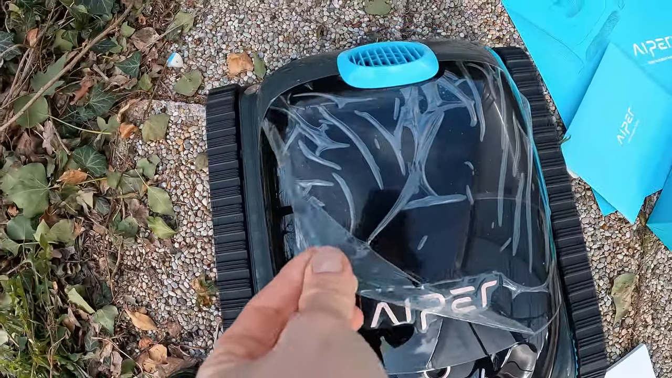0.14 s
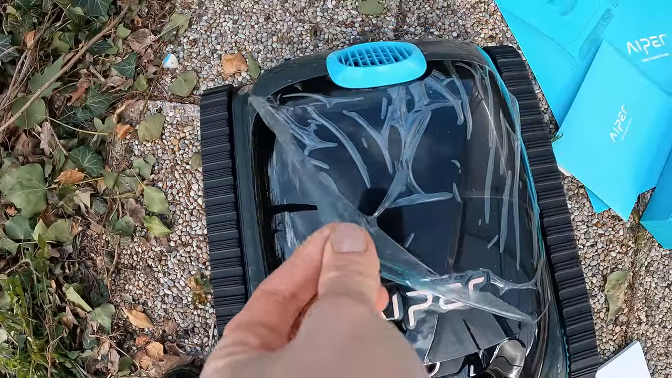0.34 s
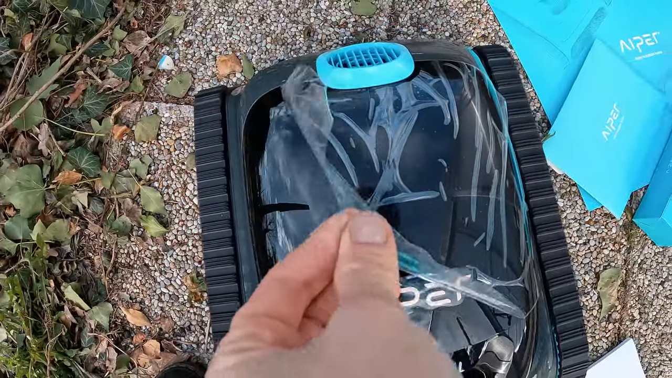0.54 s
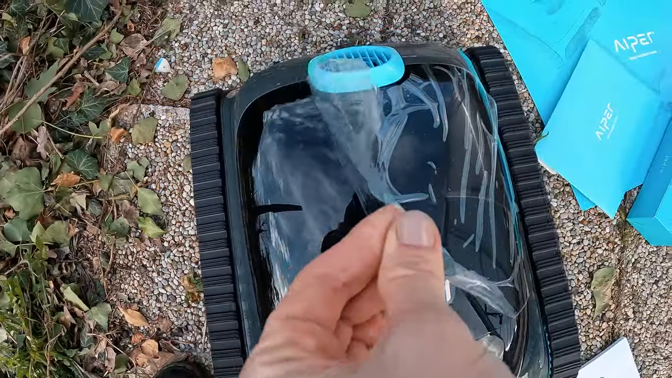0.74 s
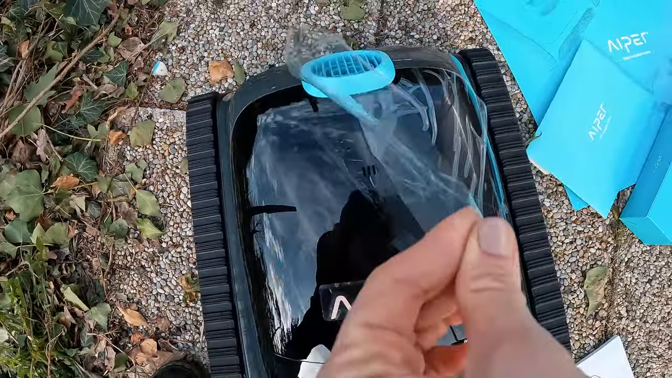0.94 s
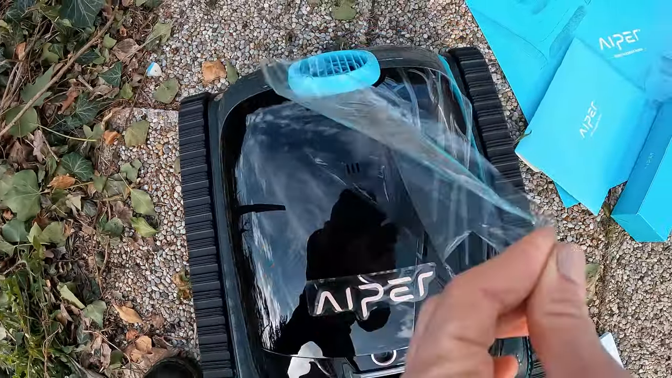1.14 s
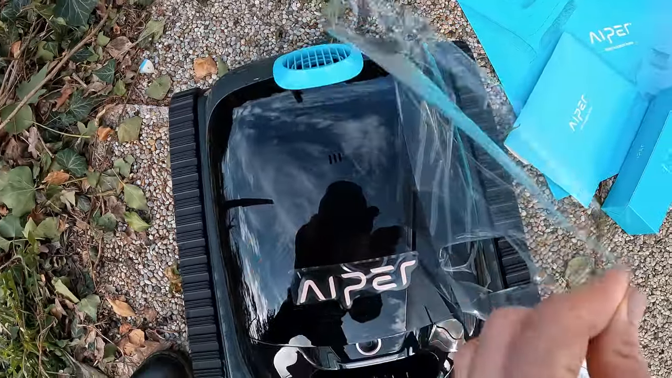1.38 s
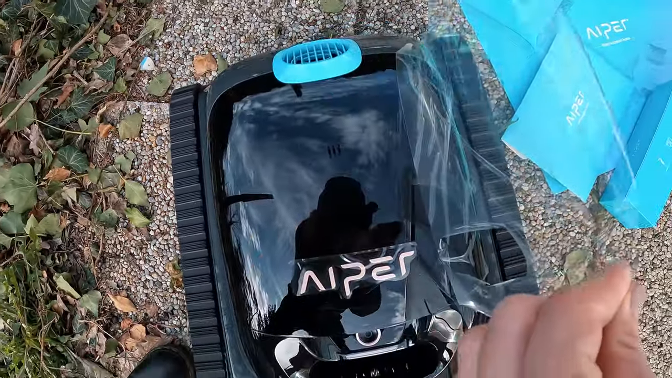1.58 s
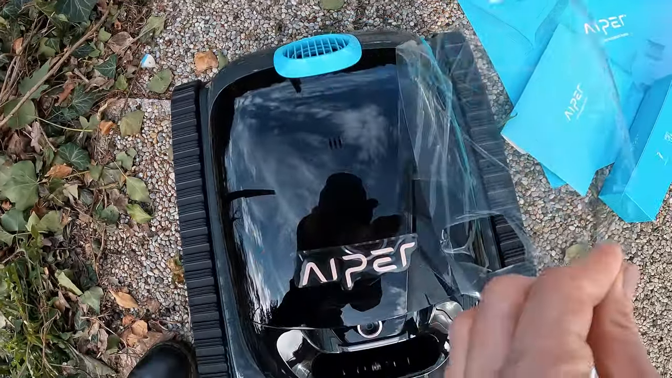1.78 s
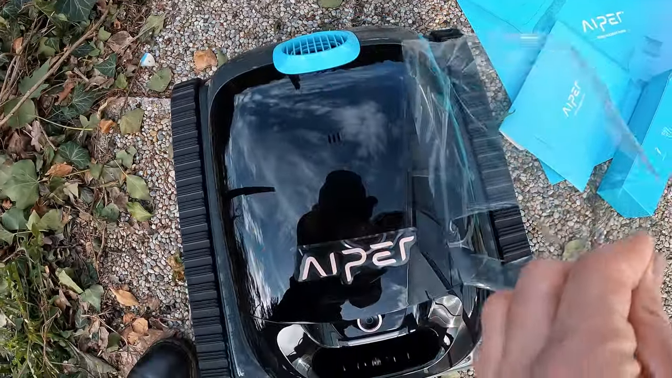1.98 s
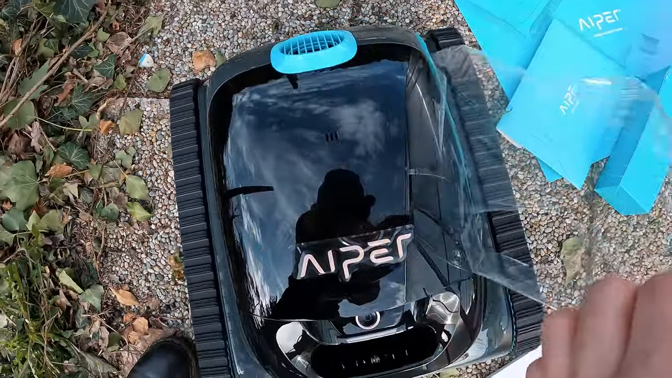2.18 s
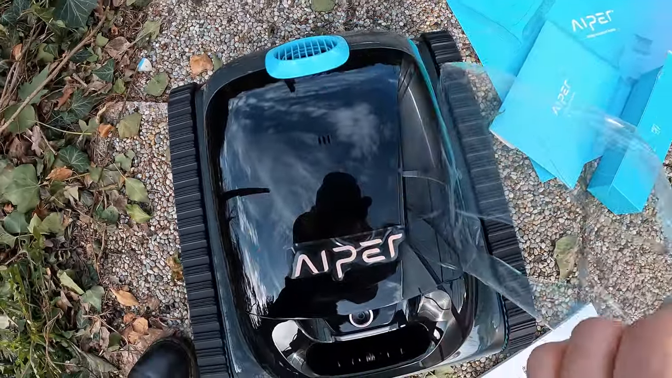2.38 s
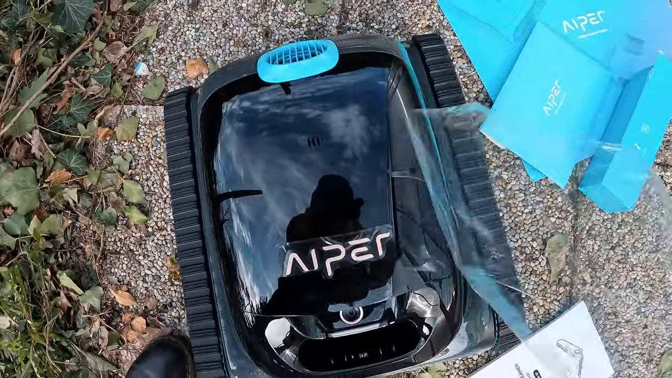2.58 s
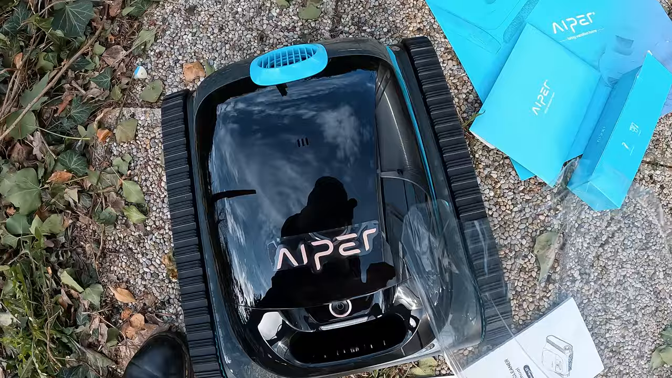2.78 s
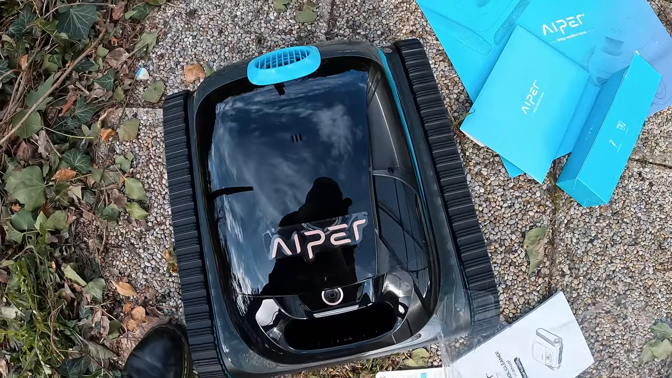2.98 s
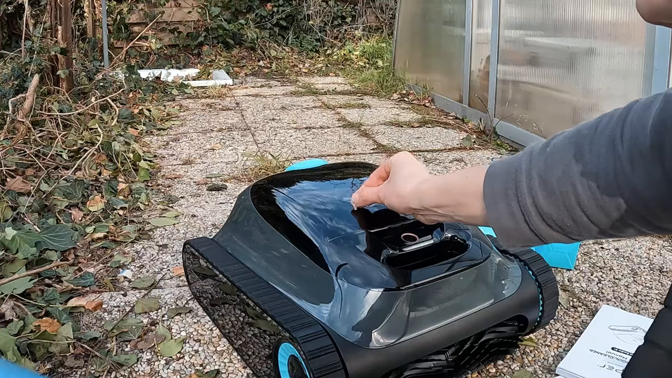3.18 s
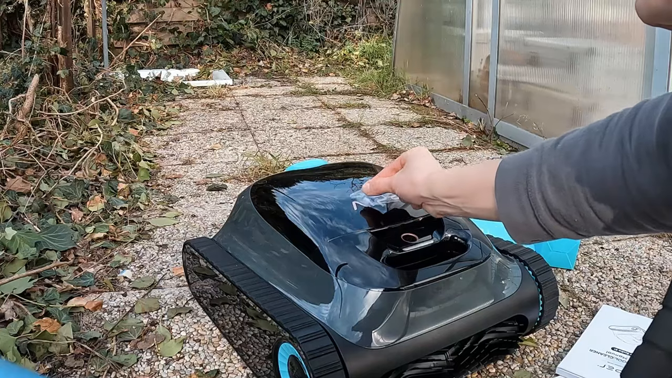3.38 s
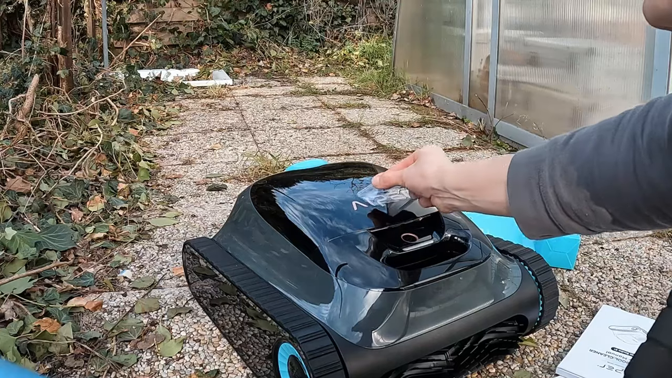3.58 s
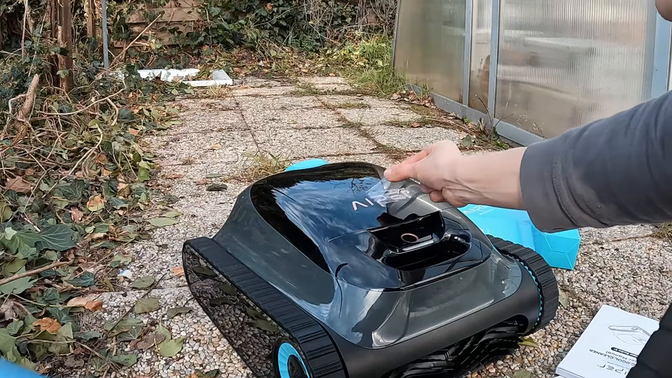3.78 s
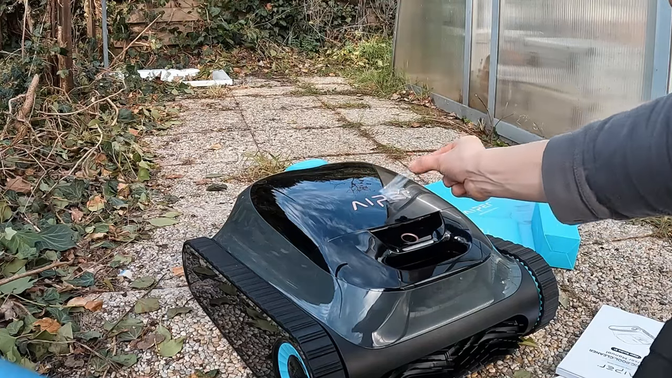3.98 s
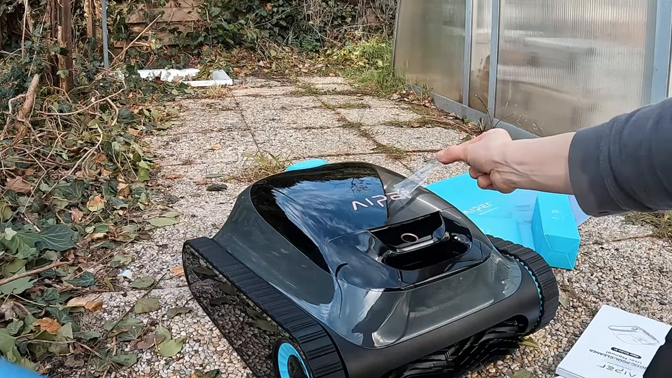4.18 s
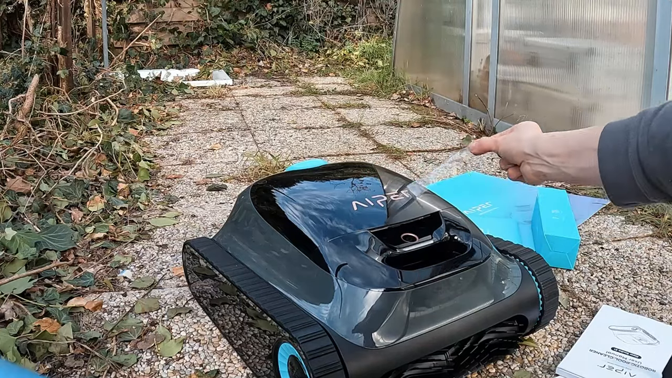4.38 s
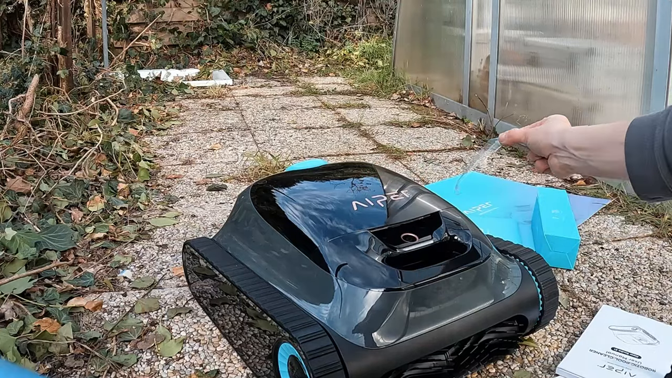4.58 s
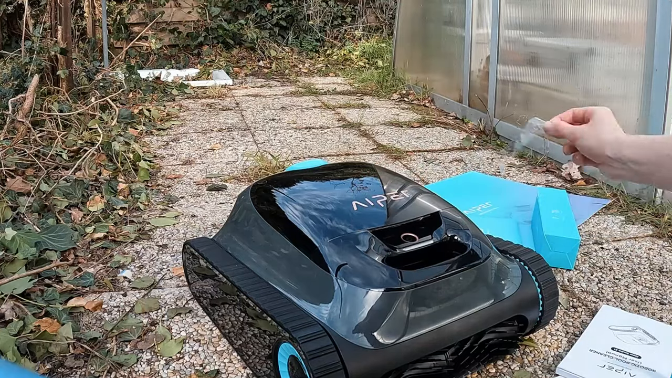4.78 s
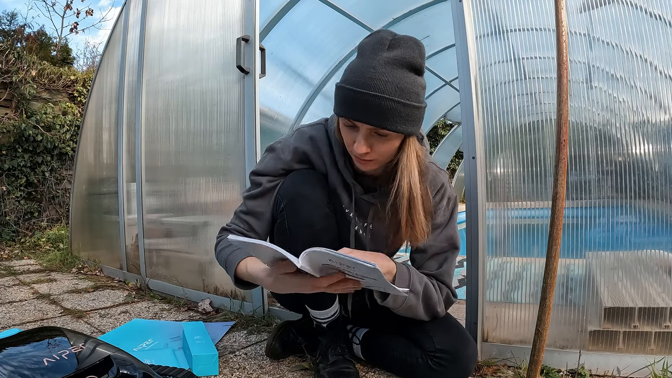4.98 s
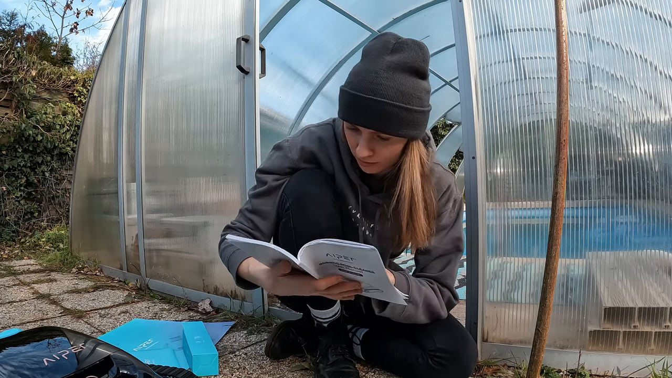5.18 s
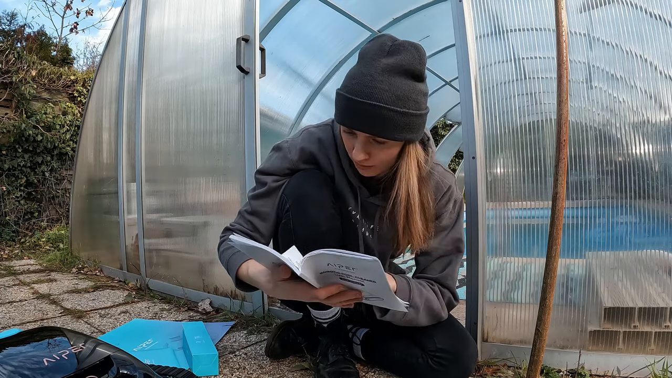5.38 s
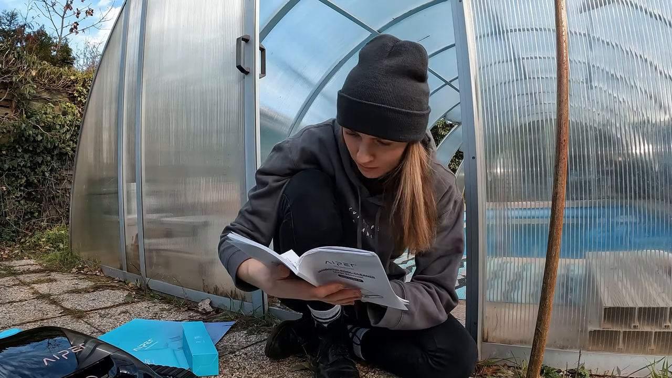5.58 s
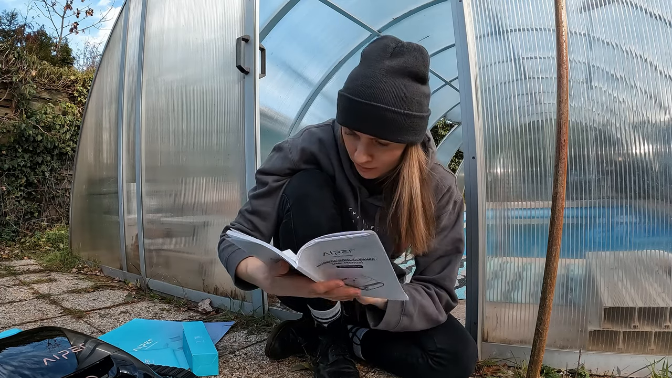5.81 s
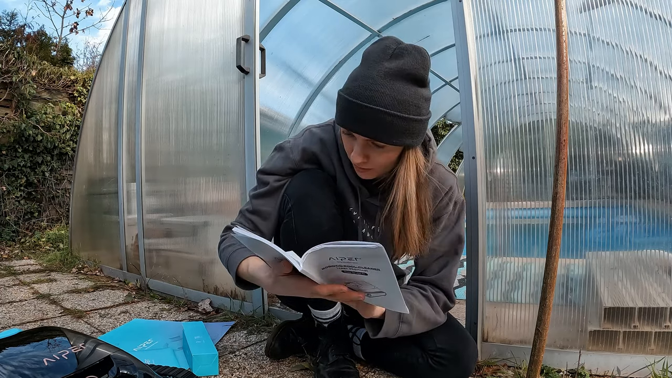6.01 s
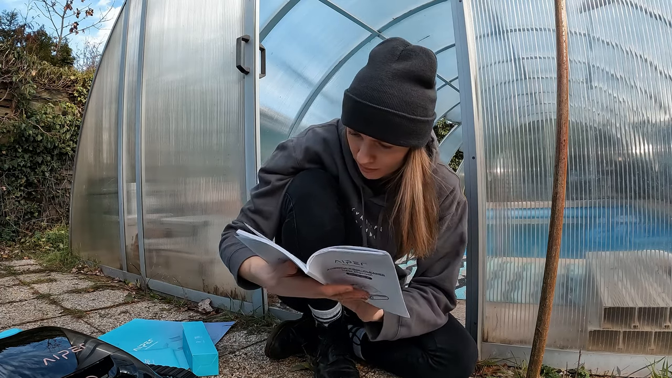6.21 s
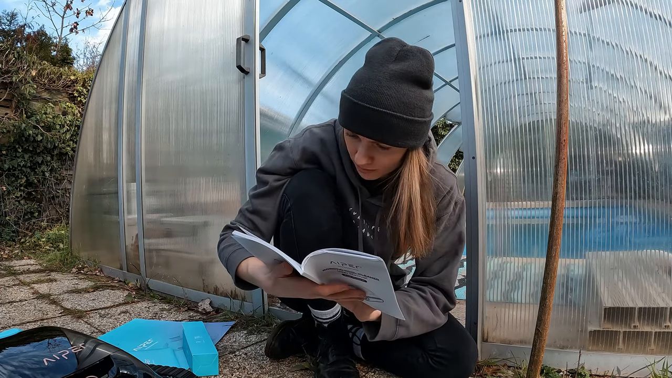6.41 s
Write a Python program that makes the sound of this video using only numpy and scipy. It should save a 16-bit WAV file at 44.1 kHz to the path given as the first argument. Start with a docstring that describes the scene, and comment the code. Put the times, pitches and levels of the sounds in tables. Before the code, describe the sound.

Close outdoors, a large sheet of clinging film is pulled from a hollow plastic lid in bright, sizzling tugs with sharp snaps and a squeak. After a lull, faster pulls end in a hollow thump. A narrow strip then peels more quietly with dry ticks. Finally pages rustle softly while small birds whistle and trill, and a harsh squawk bursts in at the very end.

```python
"""A garden: protective film is peeled off a glossy plastic lid. A large sheet comes off in several pulls and ends
with a thump of the hollow shell, then a narrow strip follows. Random tiny clicks, coloured by filters, make the
slipping glue and the rustling film and pages; short kicks make the creases snap; fading sine waves make the shell
ring. Small birds are gliding sine waves, and the harsh squawk that begins near the end is clicks through
narrow resonances. Filtered noise makes the air behind it all."""
import sys
import numpy as np
from scipy import signal
from scipy.fft import rfft, irfft, next_fast_len
from scipy.io import wavfile
from scipy.ndimage import uniform_filter1d

SR = 44100
rng = np.random.default_rng(int(sys.argv[2]) if len(sys.argv) > 2 else 0)


def generate_wav(signal):
    """Clip the signal to [-1, 1] and save it as 16-bit WAV at the path in sys.argv[1]."""
    frames = np.transpose(np.atleast_2d(signal))
    scaled = np.clip(frames, -1, 1) * 32767
    pcm = np.round(scaled).astype(np.int16)
    wavfile.write(sys.argv[1], SR, pcm)


N = 284397
TIME = np.arange(N) / SR  # seconds

# tone colours, only their shape counts: (frequency [Hz], level per Hz [dB])
AIR_COLOUR = [(25, -14.5), (90, -22.5), (170, 4.5), (400, 2.5), (800, -3.5), (1800, -4.5), (3700, -5.5),
              (6000, -18.5), (8000, -28), (12500, -34)]
PAGE_COLOUR = [(40, -41), (170, -6), (400, -2), (900, -10), (1400, -0.5), (2300, 0.5), (3600, -3),
               (6000, -9), (8000, -24), (12000, -30)]
STRIP_COLOUR = [(400, -25.5), (1200, -11), (1900, -7.5), (2700, -0.5), (3200, -2.5), (3900, 4.5),
                (5000, -6), (6000, -6), (8000, -16.5), (11800, -15.5), (13500, -26)]
FLAP_COLOUR = [(60, -31), (110, -20.5), (170, -2), (450, -1.5), (1100, -3.5), (2000, -24), (5000, -63.5)]
SHEET_COLOUR = [(300, -21), (700, -5.5), (1400, -5), (2200, 0), (3500, 0), (5000, -2.5), (7000, -6),
                (8300, -13.5), (11500, -8), (13500, -18)]
# the garden is heard from three places in turn: (from time [s], air level [dB], low rumble level [dB])
PLACES = [(-.1, -58, -95), (3.108, -55.5, -89), (4.947, -63, -72)]
# how long echoes last in the yard: (frequency [Hz], time to fade by 60 dB [s])
YARD_FADE = [(150, 0.4), (2000, 0.67), (8000, 0.61), (13000, 0.4)]
# single bird notes: (time [s], length [s], first pitch [Hz], last pitch [Hz], level [dB])
BIRD_NOTES = [(3.107, 0.067, 6800, 6750, -65), (4.585, 0.29, 4330, 3630, -59),
              (5.291, 0.049, 6120, 5720, -60), (5.338, 0.044, 6000, 5750, -60.5),
              (5.801, 0.14, 3804, 4130, -51), (6.08, 0.16, 8200, 8270, -72), (6.198, 0.03, 6770, 6020, -67),
              (6.23, 0.12, 3510, 4980, -55)]
# resonances of the squawk: (frequency [Hz], half the width of each filter [Hz], relative level [dB])
SQUAWK_RESONANCES = [(1160, 66, -4.5), (1480, 440, 4), (1776, 60, 1.5), (2070, 110, 5), (2640, 84, 2)]
# rubs of the loose film, then of the pages: (start [s], length [s], level at the top of the arch [dB])
RUBS = [(1.46, 0.2, -49.5), (1.863, 0.099, -44), (1.96, 0.051, -37), (4.398, 0.46, -65),
        (4.85, 0.11, -53.5), (5.063, 0.33, -58), (5.405, 0.056, -52), (5.478, 0.074, -54),
        (5.976, 0.13, -50.5)]
# flicks of the loose film and of the pages: (time [s], peak [dB], pitch [Hz])
FLICKS = [(4.873, -27.5, 4150), (5.365, -38, 1900), (5.449, -37.5, 2520), (5.818, -40, 4140),
          (6.263, -35.5, 3330)]
# ringing modes of the hollow shell: (frequency [Hz], relative level [dB], time to fade by 60 dB [s])
SHELL_MODES = [(186, -17, 0.2), (211, 0.5, 0.22), (244, 1.5, 0.16), (375, 4, 0.31), (554, -8, 0.53),
               (614, 0, 0.17), (859, -3, 0.15)]
# tugs on the film knock the lid: (time [s], peak [dB], pitch [Hz])
KNOCKS = [(1.788, -39.5, 706), (2.094, -31, 340), (2.213, -32.5, 323), (2.362, -33, 292),
          (3.281, -33.5, 1250), (3.313, -38.5, 1150), (3.547, -41, 300)]
# creases that snap: (time [s], peak [dB], pitch [Hz])
SNAPS = [(.063, -25.5, 2560), (.683, -14, 1710), (.92, -13.5, 1700), (1.833, -39.5, 2360),
         (1.846, -27, 2840), (1.892, -26, 1880), (1.902, -25.5, 1860), (1.922, -28, 3150),
         (1.945, -30, 1910), (1.974, -23, 2100), (1.979, -25.5, 2000), (1.989, -19.5, 1900),
         (2.096, -12.5, 2340), (2.279, -11.5, 3070), (2.36, -14, 2000), (2.522, -21, 2900),
         (2.531, -10, 2030), (2.546, -27, 2200), (2.553, -13, 4140), (2.595, -11, 2820),
         (2.619, -7.5, 3080), (3.284, -24, 3730), (3.315, -27, 4050), (3.388, -41, 5500),
         (3.402, -25, 3300), (3.454, -22, 3040), (3.58, -27, 4140), (3.882, -22, 4300), (3.979, -23, 5300),
         (3.996, -24, 3730), (4.023, -29.5, 3920), (4.181, -23.5, 4510), (4.289, -24, 3864),
         (4.361, -25, 3640)]
# the film squeaks between two pulls: (time [s], pitch [Hz], level [dB])
SQUEAK = [(.064, 1860, -45.5), (0.079, 1910, -51), (.1, 1985, -39), (0.114, 2060, -39)]
# the freed sheet wobbles, rising as it straightens: (time [s], pitch [Hz], level [dB])
WOBBLE = [(2.65, 260, -29), (2.695, 412.4, -39), (2.727, 625, -37.5)]
# resonance of the strip's freed length: (time [s], frequency [Hz])
STRIP_RING = [(3.7, 6930), (4.12, 5530)]
# pulls on the narrow strip: (start [s], length [s], level [dB], change over the pull [dB])
STRIP_PULLS = [(3.212, 0.059, -41, 0), (3.311, 0.04, -40, 0.5), (3.432, 0.11, -40.5, 2),
               (3.686, 0.15, -45, -1), (3.819, 0.053, -40, 1), (4.02, 0.13, -46.5, 0.5),
               (4.202, 0.12, -49.5, 5.5), (4.344, 0.13, -46.5, 8)]
# pulls on the large sheet:
# (start [s], length [s], rise [s], level [dB], change over the pull [dB], sizzle centre at that level [Hz])
SHEET_PULLS = [(-.02, 0.039, .015, -26.5, 0, 4200), (0.095, 0.18, 0.062, -26, 1, 5000),
               (0.266, 0.21, 0.1, -27.5, 1.5, 3920), (0.548, 0.097, 0.05, -26.5, 0.5, 3530),
               (0.629, 0.12, .03, -27.5, 1, 3780), (0.741, 0.14, 0.064, -26, 0, 3900),
               (.87, 0.34, 0.033, -30, -2.5, 3200), (1.189, 0.28, 0.16, -29, -2, 4180),
               (1.999, 0.061, 0.041, -25, 2.5, 3860), (2.059, 0.093, 0.017, -27, 2, 3870),
               (2.229, 0.39, 0.013, -28.5, 0, 3850)]

DIP_S = 0.0051  # half-width of the brief level dip at each change of place
RUMBLE_HZ, RUMBLE_WIDTH_HZ = 112, 100
TRILL_S, TRILL_STEP_S, TRILL_DB = 5.398, 0.043, -59.5  # start, spacing and typical level of its notes
BLOW_S, BLOW_DB = 2.631, -23  # the blow on the shell as the sheet comes free
STRIP_RISE_S, STRIP_RELEASE_S = 0.024, .012
STRIP_CREEP_DB = -52  # between its pulls the taut strip keeps creeping off the lid
JERKS_PER_S = 300  # slips of the strip at full speed, before their random wander
JERK_SPREAD_DB = 5.5
SHEET_RELEASE_S = 0.019
SIZZLE_POWER = 0.67  # the sizzle centre follows the speed of peeling to this power
SIZZLE_LOW_HZ = 2110  # its centre when the peel has almost stopped
FLAP_DB, FLAP_LAG_S = -18.5, 0.024  # slack film against the peel, once all of it hangs loose
SWAY_DB = -61.5  # the slack film keeps swaying as long as the hand holds it
# the freed sheet swings away just after the blow
SWING_DB, SWING_RISE_S, SWING_FALL_S, SWING_LATE_S = -28.5, 0.052, 0.017, 0.021
NOTCH_HZ, EDGE_HZ = 9020, 13500  # microphone notch, upper band limit


def gain_of(db):
    """Turns decibels into amplitude."""
    return 10 ** (np.asarray(db) / 20)


def evened(x):
    """Scales a sound to an rms (average strength) of 1."""
    return x / np.sqrt(np.mean(x ** 2) + 1e-20)


def read(points, hz):
    """Reads a table at given frequencies, on a logarithmic axis like that of hearing."""
    f, value = np.transpose(points)
    return np.interp(np.log(hz + 1), np.log(f + 1), value)


def level(s, db):
    """A gain that follows dB points and is practically silent outside them."""
    return gain_of(np.interp(TIME, s, db, left=-120, right=-120))


def add(mix, s, sound):
    """Mixes a sound in at a time in seconds."""
    part = mix[max(round(s * SR), 0):][:len(sound)]
    part += sound[:len(part)]


def filtered(x, order, hz, kind):
    """A plain low, high or band filter."""
    return signal.sosfilt(signal.butter(order, hz, kind, fs=SR, output="sos"), x)


def wander(hz):
    """Smooth random motion of rms 1; a higher rate moves faster."""
    size = next_fast_len(N, real=True)
    f = np.fft.rfftfreq(size, 1 / SR)
    spectrum = rfft(rng.standard_normal(size)) * np.exp(-(f / hz) ** 2)
    return evened(irfft(spectrum, size)[:N])


def coloured(x, points):
    """Gives a sound a tone colour without smearing clicks backwards, so their fronts stay sharp; rms 1."""
    log_gain = np.log(gain_of(read(points, abs(np.fft.fftfreq(4096, 1 / SR)))))
    spectrum = np.exp(np.conj(signal.hilbert(log_gain)))  # minimum phase
    taps = np.fft.ifft(spectrum).real[:2048]
    return evened(signal.oaconvolve(x, taps)[:N])


def resonate(x, hz, width):
    """A resonance of gain 1 whose frequency can follow a curve."""
    turn = np.exp(2j * np.pi * np.cumsum(hz * np.ones(len(x))) / SR)
    r = np.exp(-np.pi * width / SR)
    # shift the resonance down to 0 Hz, smooth there, shift back
    smooth = signal.lfilter([1 - r], [1, -r], x / turn + 1e-18)
    return 2 * (turn * smooth).real


def slips(per_s, spread_db):
    """A random train of tiny clicks, a few much larger than the rest; rms 1."""
    size = gain_of(spread_db * np.minimum(rng.exponential(1, N), 4))
    happens = rng.random(N) < per_s / SR
    return evened(size * rng.choice([-1, 1], N) * happens)


def patchy(x, depth_db):
    """Patches of pitch come and go, as film resonances do when its free length and tension change."""
    z = signal.stft(x, nperseg=512, noverlap=384)[2]
    patches = uniform_filter1d(rng.standard_normal(z.shape), size=4, axis=0)  # smooth over frequency
    patches = uniform_filter1d(patches, size=22, axis=1)  # smooth over time
    varied = z * gain_of(depth_db * evened(patches))
    return evened(signal.istft(varied, nperseg=512, noverlap=384)[1][:N])


def clicks(rows, width_hz, ring_s, ring_db, reach):
    """A sharp kick and a brief shiver around its own pitch; low ones have less treble, high ones less bass."""
    out, t = np.zeros(N), np.arange(SR // 20) / SR
    for s, db, hz in rows:
        kick = gain_of(ring_db) * rng.standard_normal(len(t)) * np.exp(-t / ring_s)
        kick[0] += 1
        edges = [130 + (hz / 150) ** 2, min(reach * hz, SR / 3)]
        snap = filtered(resonate(kick, hz, width_hz), 3, edges, "band")
        add(out, s, gain_of(db) * snap / abs(snap).max())
    return out


def glide(points, rough):
    """A rough tone of the film that follows points of time, pitch and level."""
    s, hz, db = np.transpose(points)
    pitch = np.interp(TIME, s, hz) * (1 + rough * wander(hz=300))
    turns = np.cumsum(pitch) / SR
    return np.sqrt(2) * uniform_filter1d(level(s, db), size=200) * np.sin(2 * np.pi * turns)


def stroke(start, length, rise_s, change_db, release_s):
    """One pull of the hand: it gathers speed, holds while tiring or gaining, and lets go."""
    t = TIME - start
    rise = np.sin(np.pi / 2 * np.clip(t / rise_s, 0, 1)) ** 2
    change = gain_of(change_db * np.clip(t / length, 0, 1))
    return rise * change * np.exp(-np.maximum(t - length, 0) / release_s)


def air():
    """Distant outdoor wash that swells a little and a low rumble, each with its own level in each place."""
    s, db, rumble_db = np.transpose(PLACES)
    place = np.searchsorted(s, TIME) - 1
    rumble = rng.standard_normal(N)
    for _ in range(2):
        rumble = resonate(rumble, RUMBLE_HZ, RUMBLE_WIDTH_HZ)
    wash = coloured(rng.standard_normal(N), AIR_COLOUR) * gain_of(1.8 * wander(hz=2.0))
    return gain_of(db[place]) * wash + gain_of(rumble_db[place]) * evened(rumble)


def dips():
    """The level dips briefly where one place gives way to the next, passing through zero."""
    return 1 - sum(np.exp(-((TIME - s) / DIP_S) ** 2) for s, *_ in PLACES) * 1.5


def yard(x):
    """Scattered echoes from paving, hedge and walls; the middle pitches last longest."""
    late_enough = TIME[:SR] > .008
    taps = rng.standard_normal(SR) * (rng.random(SR) < 3000 / SR) * late_enough
    hz, t, z = signal.stft(taps, SR, nperseg=256)
    fade = gain_of(-60 * t / read(YARD_FADE, hz)[:, None])
    tail = signal.istft(z * fade, SR, nperseg=256)[1]
    return signal.fftconvolve(x, tail / np.linalg.norm(tail))[:N]


def birds():
    """Thin whistles and a trill of quick upsweeps; long notes warble more, and so do those that glide far."""
    out, waver = np.zeros(N), wander(hz=448)
    trill = [(TRILL_S + k * TRILL_STEP_S, .036, 4720 + 70 * a, 5320 + 70 * b, TRILL_DB + c)
             for k, (a, b, c) in enumerate(rng.standard_normal((12, 3)))]
    for s, length, first_hz, last_hz, db in [*BIRD_NOTES, *trill]:
        count = int(length * SR)
        warble = .12 * length + .25 * np.log(last_hz / first_hz) ** 2
        hz = np.linspace(first_hz, last_hz, count) * (1 + warble * waver[int(s * SR):][:count])
        whistle = np.sqrt(2) * np.sin(2 * np.pi * np.cumsum(hz) / SR)
        add(out, s, gain_of(db) * signal.windows.tukey(count, .5) * whistle)
    return out * gain_of(2 * wander(hz=120))


def squawk():
    """A sudden harsh rasp: dense clicks ring a few narrow resonances, each filtered twice."""
    rasp = slips(per_s=3500, spread_db=4.0)
    call = np.zeros(N)
    for hz, w, db in SQUAWK_RESONANCES:
        call += gain_of(db) * evened(resonate(resonate(rasp, hz, 2 * w), hz, 2 * w))
    onset = np.clip((TIME - 6.411) / 0.001, 0, 1)
    return gain_of(-32.5) * evened(call) * onset


def rustle():
    """Soft rubs of film and paper, each swelling and fading in one arch, with a few flicks."""
    touch = np.zeros(N)
    for s, length, db in RUBS:
        touch += gain_of(db) * np.sin(np.pi * np.clip((TIME - s) / length, 0, 1))
    rub = patchy(coloured(slips(per_s=2500, spread_db=2.5), PAGE_COLOUR), depth_db=5.0)
    return rub * touch + clicks(FLICKS, width_hz=540, ring_s=0.0059, ring_db=14.0, reach=2.1)


def shell():
    """The released lid springs back with a hollow thump: its modes ring strongly, then fade as a weaker tail,
    and a short dull slap of noise sounds with them."""
    out, t = np.zeros(N), np.arange(SR // 2) / SR
    ring = sum(gain_of(db - 60 * t / t60) * np.sin(2 * np.pi * hz * t) for hz, db, t60 in SHELL_MODES)
    ring = ring * (0.16 + np.exp(-t / 0.015))  # strong at first, then a weaker tail
    slap = evened(filtered(rng.standard_normal(len(t)), 2, 1600, "low"))
    add(out, BLOW_S, gain_of(BLOW_DB) * (ring + slap * np.exp(-t / 0.027)))
    return filtered(out, 6, 135, "high")  # a small shell radiates no deep bass


def strip_pull():
    """Level of the strip's peel line: short pulls over a slow creep that lasts from the first to the last."""
    first, end = STRIP_PULLS[0][0], STRIP_PULLS[-1][0] + STRIP_PULLS[-1][1]
    rows = [*STRIP_PULLS, (first, end - first, STRIP_CREEP_DB, 0)]
    pulls = [gain_of(db) * stroke(s, length, STRIP_RISE_S, change_db, STRIP_RELEASE_S)
             for s, length, db, change_db in rows]
    return np.max(pulls, axis=0)


def strip():
    """A narrow peel line lets go in jerks, each a bright dry tick; a faster pull merges them into a hiss.
    The freed length rings, lower as it grows."""
    pull = strip_pull()
    speed = pull / pull.max()
    rate = JERKS_PER_S * np.sqrt(speed) * np.exp(wander(hz=90.9))
    jerks = np.diff(np.floor(np.cumsum(rate) / SR), prepend=0)
    jerks = jerks * gain_of(JERK_SPREAD_DB * np.minimum(rng.exponential(1, N), np.pi))
    jerks = np.diff(jerks, prepend=0)  # a push and its recoil: mostly treble
    ticks = coloured(jerks, STRIP_COLOUR) * pull.max() * np.sqrt(speed)
    grains = slips(per_s=7600, spread_db=3.5) * gain_of(0.73 * wander(hz=68.5))
    hiss = patchy(coloured(grains, STRIP_COLOUR), depth_db=4.0)
    ring = resonate(hiss, np.interp(TIME, *np.transpose(STRIP_RING)), width=540)
    return pull * evened(hiss + gain_of(2.5) * ring) + gain_of(-17.5) * ticks


def flapping(pull, loose):
    """The slack film sways, moves with the pull, more as more of it hangs loose, and swings away at the end."""
    keep = np.exp(-1 / (FLAP_LAG_S * SR))
    t = TIME - BLOW_S - SWING_LATE_S
    swing = np.exp(np.minimum(t / SWING_RISE_S, -t / SWING_FALL_S))
    tugged = loose ** 0.53 * signal.lfilter([1 - keep], [1, -keep], pull)
    sway = gain_of(SWAY_DB) * (t < 0)
    return np.hypot(sway, gain_of(FLAP_DB) * tugged + gain_of(SWING_DB) * swing)


def sheet():
    """Dense slips of glue ring the taut film; a faster pull is brighter and adds fizz, and the slack part flaps."""
    pull, hz = np.zeros(N), np.zeros(N)
    for start, length, rise_s, db, change_db, top_hz in SHEET_PULLS:
        shape = stroke(start, length, rise_s, change_db, SHEET_RELEASE_S) + 1e-9
        # the sizzle takes its pitch from a pull that outdoes all before it
        hz = np.where(gain_of(db) * shape > pull, top_hz * shape ** SIZZLE_POWER, hz)
        pull = np.hypot(pull, gain_of(db) * shape)
    speed = pull / pull.max()
    loose = np.cumsum(pull) / pull.sum()  # share of the sheet already peeled
    grip = gain_of(1.5 * np.sqrt(loose) * wander(hz=70))  # the peel flutters more as more film hangs slack
    film = patchy(coloured(slips(per_s=14000, spread_db=3.0), SHEET_COLOUR), depth_db=3.0)
    sizzle = evened(resonate(film, np.maximum(hz, SIZZLE_LOW_HZ), width=3920))
    fizz = filtered(coloured(rng.standard_normal(N), SHEET_COLOUR), 2, 6000, "high")
    fizz = gain_of(-5.0 + 2 * wander(hz=160)) * speed * fizz
    flap = patchy(coloured(slips(per_s=1300, spread_db=2.0), FLAP_COLOUR), depth_db=4.5)
    return pull * grip * (sizzle + fizz) + flapping(pull, loose) * flap


def scene():
    """The film and the shell are close, with a faint echo from the yard; the birds are wet; all in the centre."""
    snaps = clicks(SNAPS, width_hz=2070, ring_s=0.0025, ring_db=-16, reach=2.0)
    knocks = clicks(KNOCKS, width_hz=430, ring_s=0.0082, ring_db=-21, reach=3.1)
    tones = glide(SQUEAK, rough=0.011) + glide(WOBBLE, rough=.12)
    loud = sheet() + snaps + knocks + tones + shell() + squawk()
    small = strip() + rustle()
    song = birds()
    echoes = yard(gain_of(-14.5) * loud + gain_of(-20) * small + gain_of(-5.5) * song)
    mix = (loud + small + song + echoes + air()) * dips()
    return np.array([mix, mix])


def record(dry):
    """The microphone has a narrow notch in the treble, made by two filters; then the highest pitches are cut."""
    notched = dry
    for sharpness in (9, 14):
        notched = signal.lfilter(*signal.iirnotch(NOTCH_HZ, sharpness, fs=SR), notched)
    band_limit = signal.firwin(161, EDGE_HZ, window=("kaiser", 9), fs=SR)
    return signal.oaconvolve(notched, band_limit[None], "same")


dry = scene()
out = record(dry)
generate_wav(out)
```